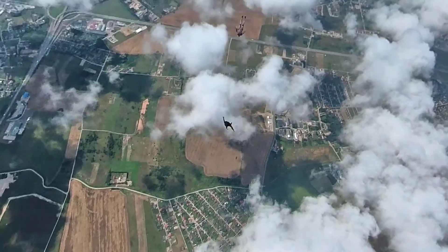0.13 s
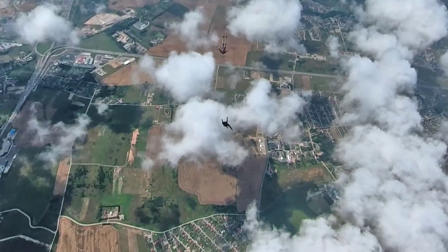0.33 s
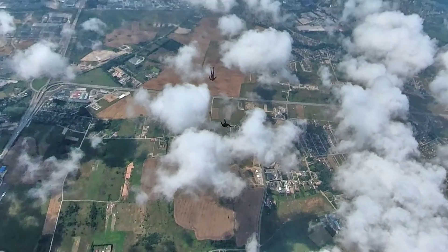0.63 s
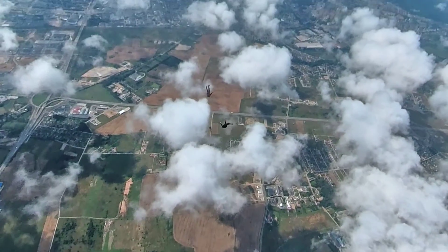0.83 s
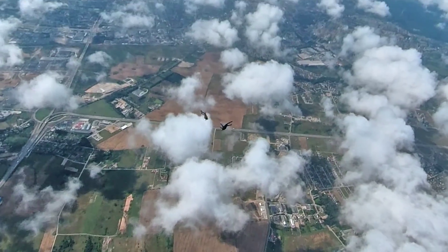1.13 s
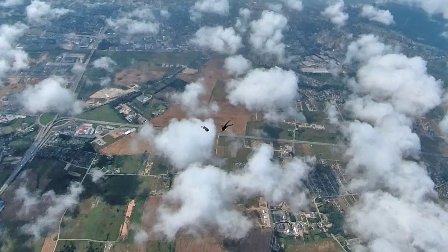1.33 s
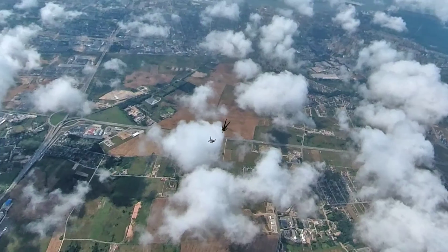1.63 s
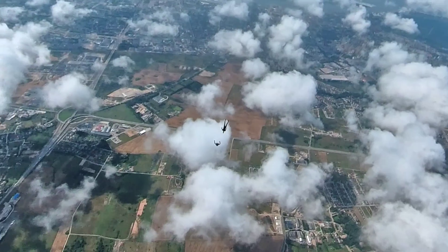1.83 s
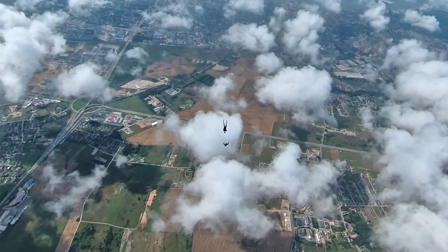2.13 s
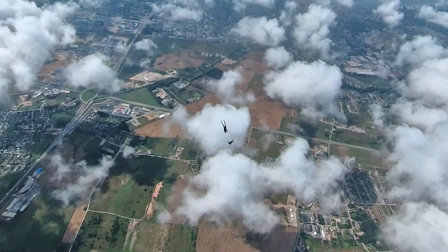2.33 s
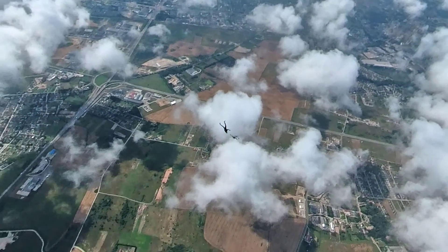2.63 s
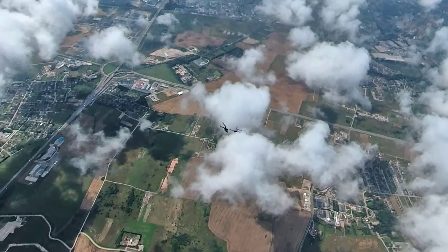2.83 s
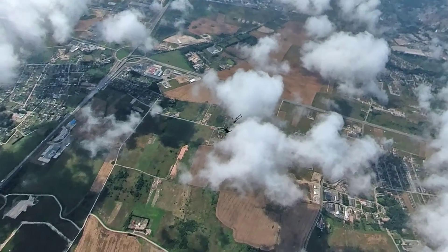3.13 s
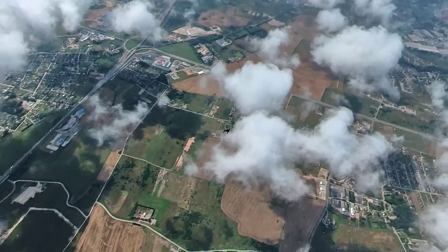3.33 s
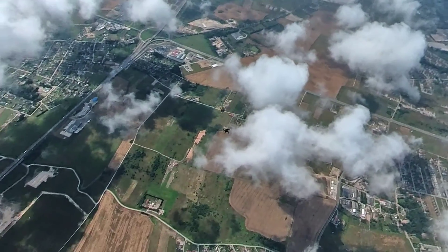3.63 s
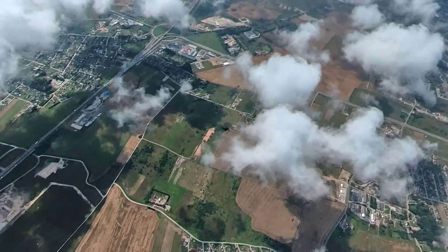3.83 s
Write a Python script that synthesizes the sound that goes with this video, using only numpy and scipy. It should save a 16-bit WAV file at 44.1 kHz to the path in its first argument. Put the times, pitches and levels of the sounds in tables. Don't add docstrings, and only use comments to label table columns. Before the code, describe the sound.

Deep, turbulent wind with a thin hiss overloads an exposed microphone among the clouds. It cuts out early, returns as a sustained roar, then stutters, dips and pops hard towards the end.

```python
import sys
import numpy as np
from scipy import signal
from scipy.fft import rfft, irfft, next_fast_len
from scipy.io import wavfile
from scipy.ndimage import uniform_filter1d, map_coordinates

SR = 44100
rng = np.random.default_rng(int(sys.argv[2]) if len(sys.argv) > 2 else 0)


def volts_from_decibels(level):
    exponent = np.asarray(level, float) / 20
    return 10 ** exponent


def pcm_store(signal):
    levels = np.round(np.clip(np.atleast_2d(signal), -1, 1) * 32767)
    wavfile.write(sys.argv[1], SR, levels.astype(np.int16).T)


N = 176400


def unit(x):
    return x / np.sqrt(np.mean(x ** 2) + 1e-20)


def curves(rows):
    s, *columns = np.transpose(rows)
    return [np.interp(np.arange(N) / SR, s, column) for column in columns]


def wobble(rate):
    points = rng.standard_normal(int(N * rate / SR) + 4)
    return map_coordinates(points, [np.arange(N) * rate / SR])


def filtered(x, response):
    size = next_fast_len(N + SR // 2)
    hz = np.fft.rfftfreq(size, 1 / SR) + 1e-3
    return irfft(rfft(x, size) * response(hz), size)[..., :N]


LOW_CUT_HZ, LOW_CUT_Q = 50, 0.6


def low_cut(hz):
    s = 1j * hz / LOW_CUT_HZ
    return s * s / (1 + s / LOW_CUT_Q + s * s)


def rush(spectrum, patchy_db):
    noise = signal.stft(rng.standard_normal(N), nperseg=512)[2]
    patches = uniform_filter1d(rng.standard_normal(noise.shape), size=6, axis=0)
    patches = uniform_filter1d(patches, size=10, axis=1)
    x = signal.istft(noise * volts_from_decibels(patchy_db * unit(patches)), nperseg=512)[1][:N]
    f, db = np.transpose(spectrum)

    def color(hz):
        wanted = volts_from_decibels(np.interp(np.log(hz), np.log(f), db))
        return wanted / np.maximum(abs(low_cut(hz)), .1)

    x = filtered(x, color)
    return x / np.std(filtered(x, low_cut))


# t/s, level/dB
TICK_TIMES = [(.014, -57.5), (.024, -57.5), (0.093, -69), (.104, -55.5), (.504, -58), (0.513, -36.5),
              (0.535, -45.5), (2.744, -44), (2.795, -61), (2.895, -50), (3.366, -44), (3.385, -44)]


def ticks():
    jumps = np.zeros(N)
    for s, db in TICK_TIMES:
        jumps[round(s * SR)] = volts_from_decibels(db)
    return np.cumsum(jumps)


# start t/s, length t/s, center f/Hz, width f/Hz, level/dB
WHISTLE_NOTE = (.82, .125, 2750, 650, -55)


def whistle():
    s, length, center_hz, width_hz, db = WHISTLE_NOTE
    t = np.arange(N) / SR
    band = filtered(rng.standard_normal(N), lambda hz: np.exp(-((hz - center_hz) / width_hz * 2) ** 2))
    fade = np.clip(np.minimum(t - s, s + length - t) / .012, 0, 1)
    return volts_from_decibels(db) * unit(band) * fade


# t/s, peak level/dB, direction and strength [sign: in or out]
SLAP_TIMES = [(-.0003, -17, -1), (0.07, -7, 1), (0.838, -7.5, -0.64), (1.135, -1.5, 0.8), (2.711, 0, -0.4),
              (2.815, -7.5, -1.2), (2.915, -6, -0.77), (3.403, -1.5, 0.97), (3.803, -4.5, 0.73),
              (3.843, -13.5, 1), (3.947, 3, 0.7), (3.9995, -10.5, -1.3)]
SLAP_S = .001


def slaps():
    t = np.arange(N) / SR
    return sum(way * volts_from_decibels(db) / (1 + ((t - s) / SLAP_S) ** 2) ** 1.7 for s, db, way in SLAP_TIMES)


# start t/s, release t/s, what leaks through level/dB,
# rebound on release level/dB, rebound pitch f/Hz
PINNED_TIMES = [(.006, 0.02, -11.5, -27, 150.4), (0.024, 0.032, -8.5, -8, 167.4),
                (0.075, 0.491, -34.5, -51, 250), (.492, 0.511, -17, -17, 242.4),
                (0.842, 0.852, -1.5, -35.5, 204), (1.137, 1.154, -4.5, -33, 200),
                (2.62, 2.623, -24, -20, 197), (2.639, 2.646, -33, -13.5, 281),
                (2.648, 2.66, -13, -15.5, 258), (2.671, 2.678, -31, -18.5, 269),
                (2.682, 2.691, -17, -20.5, 275.6), (2.694, 2.702, -23, -18.5, 404),
                (2.716, 2.758, -27, -5, 123.4), (2.771, 2.809, -29, -14.5, 130),
                (2.815, 2.852, -22.5, -6.5, 186), (2.87, 2.877, -29, -23.5, 281),
                (2.884, 2.899, -27.5, -20.5, 285), (2.912, 2.927, -22, -13, 232),
                (3.313, 3.34, -7.5, -24, 195), (3.798, 3.831, -4, -12.5, 142.6),
                (3.846, 3.857, -13.5, -19.5, 247), (3.856, 3.877, -10, -25.5, 207),
                (3.953, 3.979, 1.5, -11, 150)]
EDGE_S = 0.0007


def freedom():
    t, db = np.arange(N) / SR, np.zeros(N)
    for s, release, leak_db, *_ in PINNED_TIMES:
        db = db + leak_db * np.clip(np.minimum(t - s, release - t) / EDGE_S + .5, 0, 1)
    return volts_from_decibels(db)


REBOUND_RISE, REBOUND_T60_S = 30, .06


def rebounds():
    out, t = np.zeros(N + SR), np.arange(SR // 10) / SR
    for _, release, _, db, hz in PINNED_TIMES:
        swing = np.sin(2 * np.pi * hz * t * (1 + REBOUND_RISE * t))
        swing = swing * (1 - np.exp(-t / 0.00055))
        out[round(release * SR):][:len(t)] += volts_from_decibels(db - 60 * t / REBOUND_T60_S) * swing
    return np.cumsum(np.diff(out[:N], prepend=0) * freedom())


# f/Hz, level/dB per Hz
HISS_COLOR = [(500, -60.5), (1300, 0.5), (1900, -7.5), (2700, -12), (3500, -20), (5500, -30), (7300, -45),
              (8500, -91)]
HISS_DB, HISS_SWAY_DB = -25.5, .4


def hiss(bright_db):
    return volts_from_decibels(HISS_DB + bright_db + HISS_SWAY_DB * wobble(7)) * rush(HISS_COLOR, patchy_db=1.5)


# f/Hz, level/dB per Hz
RUMBLE_COLOR = [(10, -39), (20, -8), (40, -6.5), (90, -0.5), (170, -4), (350, -20.5), (900, -59.5),
                (2000, -120)]
RUMBLE_DB, DARK_RUMBLE = -3.5, .1


def rumble(bright_db):
    return volts_from_decibels(RUMBLE_DB - 1.5 - DARK_RUMBLE * bright_db) * rush(RUMBLE_COLOR, patchy_db=0.3)


# f/Hz, level/dB per Hz
ROAR_COLOR = [(40, -44.5), (120, -6), (260, -1), (440, -4), (690, -10), (900, -16), (2200, -44),
              (6000, -120)]
ROAR_FOLLOWS = 0.51


def roar(bright_db):
    return volts_from_decibels(ROAR_FOLLOWS * bright_db - 2) * rush(ROAR_COLOR, patchy_db=0.46)


# t/s, roar level/dB, brightness level/dB, gust depth level/dB
AIR_CHANGES = [(0, -16.5, -14.5, 2), (.078, -16, -15, 1.5), (.1, -12, -10.5, 6.5), (.17, -45.5, -1.5, .6),
               (.49, -20, -1.5, 1.5), (.54, -11, -5.5, 0.3), (.6, -17.5, -3, 1.25), (.95, -20.5, 1.5, 1.2),
               (2.6, -20.5, 2, 0.3), (2.65, -15, -8.5, 2), (2.943, -17.5, -16, 1.5), (2.955, -38.5, 0, 6),
               (3.25, -17.5, -0.5, 0.94), (3.406, -18, -5, 3), (3.422, -28.5, -0.5, 3), (3.69, -22, 1, 2),
               (3.83, -15.5, -12.5, 2), (4, -24, -8, 3.5)]


def wind():
    level_db, bright_db, gust_db = curves(AIR_CHANGES)
    swell_db = gust_db * (0.25 * wobble(13) + 0.45 * wobble(45) + 0.55 * wobble(130))
    pressure = rumble(bright_db) + roar(bright_db) + hiss(bright_db)
    moving = np.diff(pressure, prepend=0) * volts_from_decibels(level_db + swell_db) * freedom()
    return np.cumsum(moving)


def scene():
    return (ticks() + whistle() + slaps() + rebounds() + wind())[None]


def top_cut(x):
    return signal.sosfilt(signal.butter(12, 15830, fs=SR, output="sos"), x)


CLIP = .6
TOP_HZ, TOP_STEEP = 7600, 48
WHINE_HZ, WHINE_DB = 15716, -96


def record(dry):
    x = filtered(dry, low_cut)
    x = x / (1 + abs(x / CLIP) ** 4) ** .25
    ramp = x[:, :1] + (x[:, -1:] - x[:, :1]) * np.arange(N) / N
    x = ramp + filtered(x - ramp, lambda hz: 1 / (1 + (hz / TOP_HZ) ** TOP_STEEP))

    def whine_band(hz):
        return np.exp(-((hz - WHINE_HZ) / 70) ** 2) + .2 * np.exp(-((hz - 15100) / 350) ** 2)

    whine = unit(filtered(rng.standard_normal(N), whine_band))
    loudness = uniform_filter1d(abs(x), size=120)
    x = x + volts_from_decibels(WHINE_DB) * whine * loudness * 10
    return top_cut(x)


dry = scene()
out = record(dry)
pcm_store(out)
```